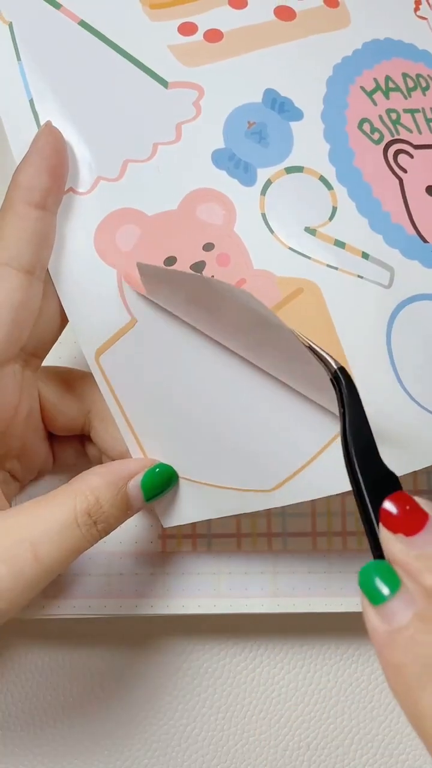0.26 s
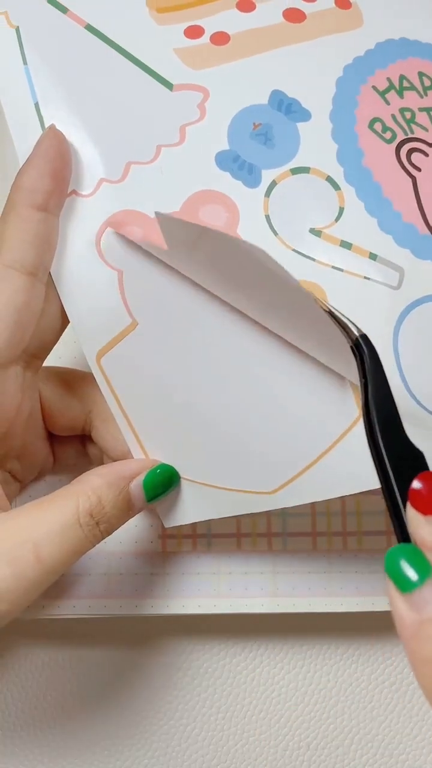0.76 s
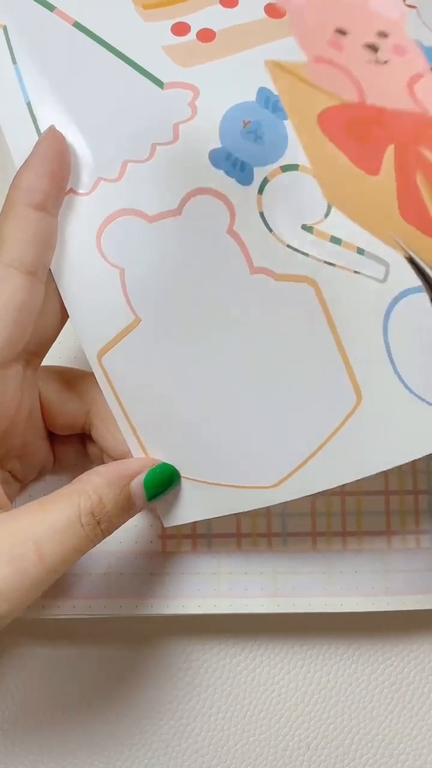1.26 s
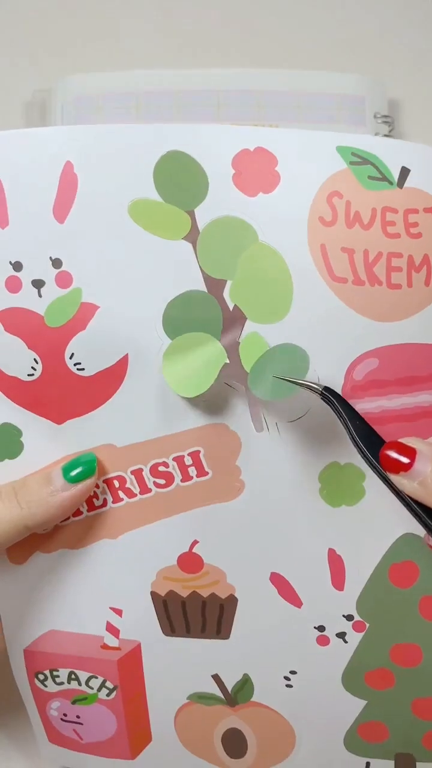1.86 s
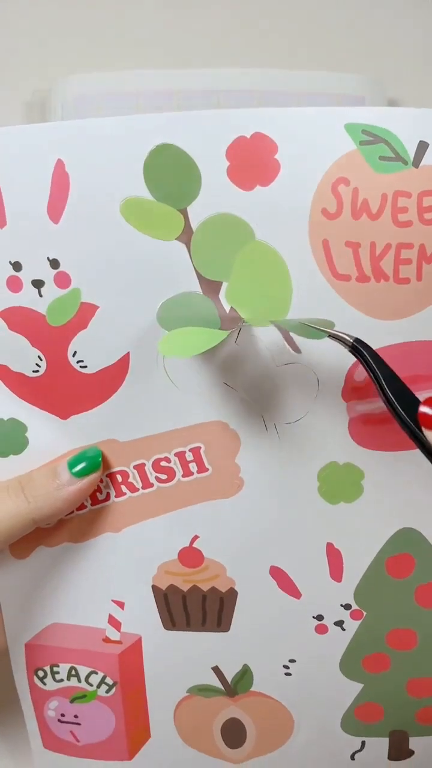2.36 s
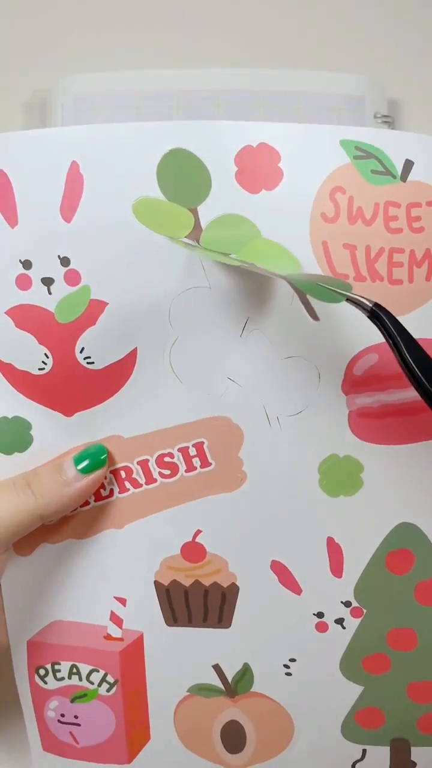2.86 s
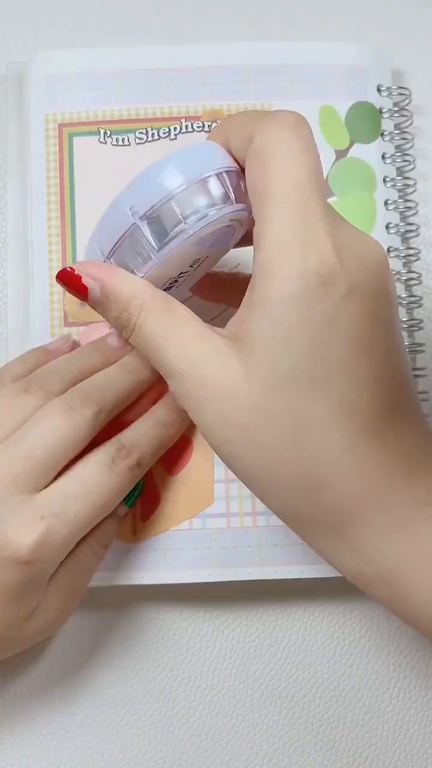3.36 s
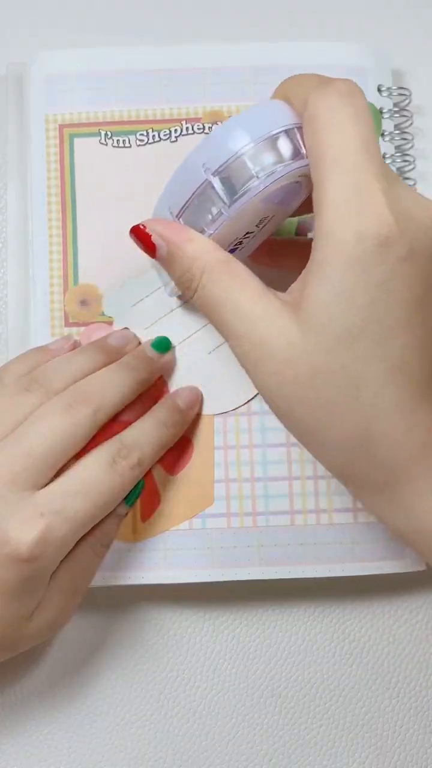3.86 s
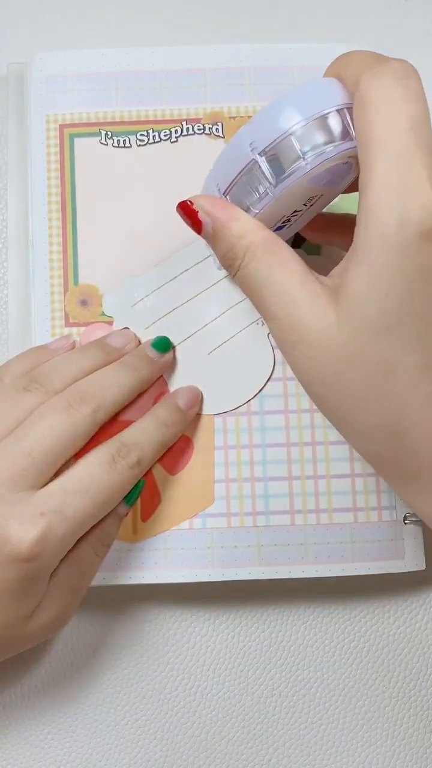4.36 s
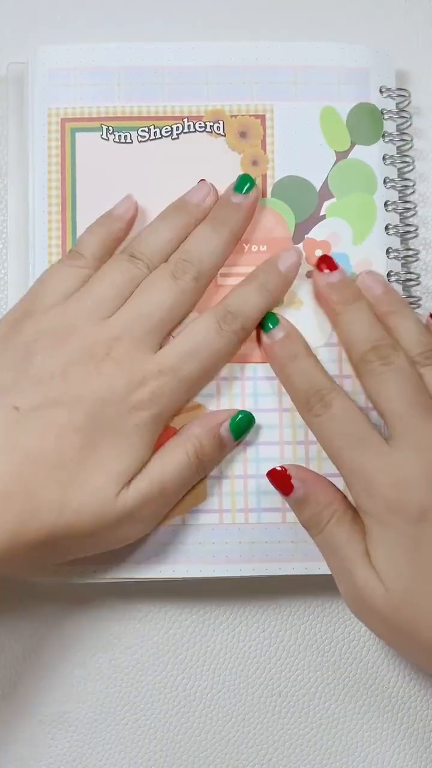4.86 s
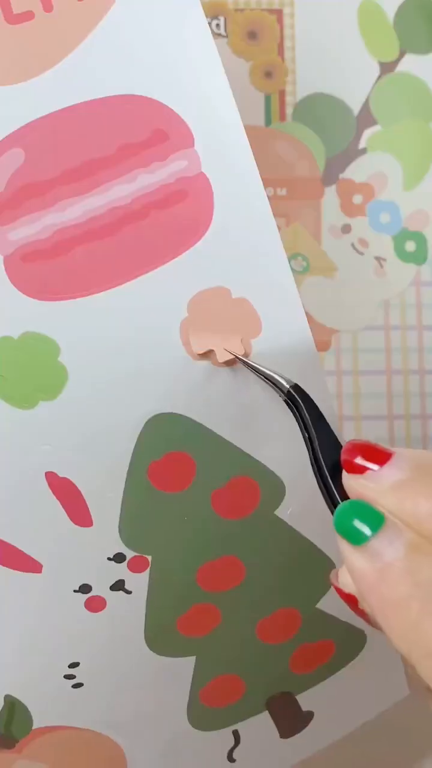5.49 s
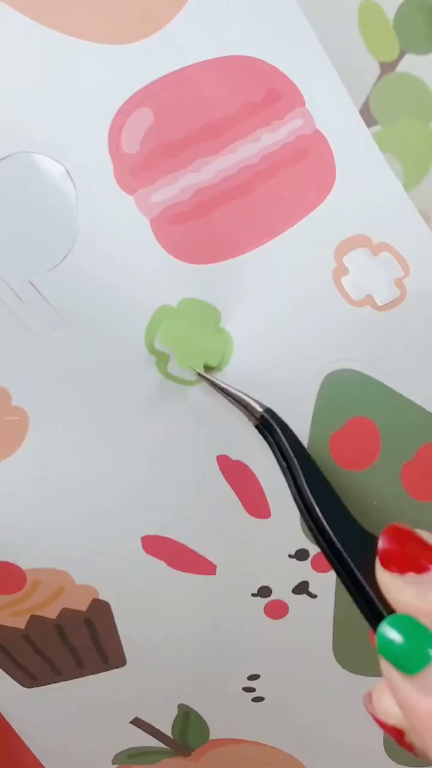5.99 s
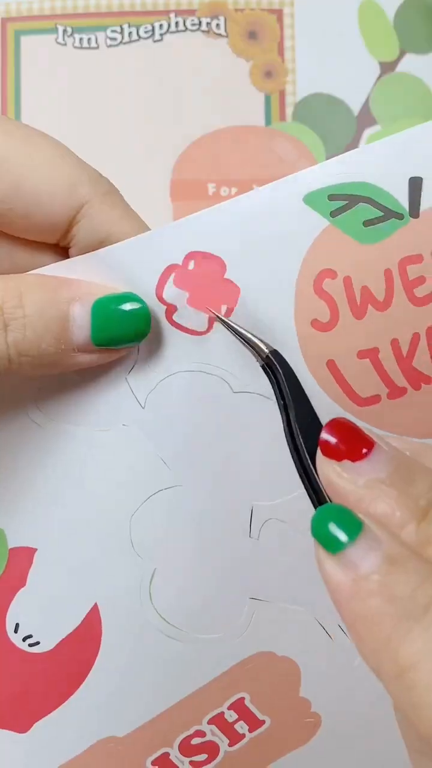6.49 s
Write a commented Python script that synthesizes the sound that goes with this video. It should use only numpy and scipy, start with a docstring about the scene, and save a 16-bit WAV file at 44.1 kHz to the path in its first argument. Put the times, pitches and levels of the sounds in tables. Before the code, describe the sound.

From the start, tweezers peel a sticker off its backing sheet, close to the microphone: irregular sharp snaps of glue over a grainy hiss, ending with papery flaps at about 1.2 seconds. A second peel crackles in jerks from 1.3 to 3.2 seconds, strongest near 2.4 and 3.1. From about 3.6 to 4.2 seconds a glue-tape roller rattles its plastic housing, with a soft tape hiss and a few more clicks up to 4.6. Then, until 5.4 seconds, fingertips rub the sticker onto a page: a smooth sliding hiss, short juddering groans of skin on paper, and a run of low, booming thumps from the desk. From 5.4 to about 6.7 seconds several short peels follow, with crisp ticks and flaps of the sheet, loudest near 6.5. The sound is fairly dry and mono, with a faint hiss and low room rumble underneath.

```python
"""Peeling and rubbing down stickers

Tweezers peel stickers off a backing sheet, close to a mono microphone on a quiet desk. The glue
snaps in jerks and hisses as its threads tear; the sheet rings and flaps. A glue-tape roller rattles
its plastic housing over a sticker, then fingertips rub it down, groaning as they stick and slip on
the page and making the desk boom. The peeling resumes; a low room rumble lies under it all."""
import sys
import numpy as np
from scipy import signal
from scipy.fft import rfft, irfft
from scipy.io import wavfile
from scipy.ndimage import uniform_filter1d

SR = 44100
rng = np.random.default_rng(int(sys.argv[2]) if len(sys.argv) > 2 else 0)


def wav_out(sig):
    """Save sig, one row per channel (or a flat mono array), as 16-bit PCM at SR to the path in sys.argv[1]."""
    wavfile.write(sys.argv[1], SR, np.round(np.clip(np.atleast_2d(sig).T, -1, 1) * 32767).astype(np.int16))


N = 296793

# room tone spectrum: (frequency [Hz], level [dB])
ROOM_SPECTRUM = [(22, 5.5), (60, -10.5), (250, -4), (400, -16), (1000, -23), (3000, -34), (9000, -33),
                 (11000, -31), (15500, -35), (16400, -60)]
# rumble bed: (time [s], level near 50 Hz [dB], level near 100 Hz [dB])
RUMBLE_LEVELS = [(0.0, -46, -40.5), (0.3, -43.5, -34.5), (0.9, -42, -45), (2.1, -41.5, -49),
                 (3.5, -37.5, -43), (4.6, -34.5, -35.5), (5.4, -34.5, -42.5), (6.73, -44, -49.5)]
# a moving hand swells the rumble: (crest time [s], level [dB])
RUMBLE_SWELLS = [(1.1, -38), (1.69, -39.5), (2.5, -35), (3.15, -31.5), (3.45, -39), (4.8, -27), (4.93, -29),
                 (5.22, -18), (5.7, -45), (5.9, -34), (6.2, -32), (6.48, -29)]
# steady pull on the glue line, one envelope a sticker: (time [s], hiss level [dB])
PEEL_STROKES = [
    [(0.0, -40), (0.2, -45), (0.37, -44.5), (0.72, -46.5), (0.98, -37.5), (1.05, -31.5), (1.15, -44),
     (1.2, -60), (1.33, -68)],
    [(1.335, -46), (1.45, -40), (1.57, -64), (1.87, -53), (2.17, -64.5), (2.45, -52.5), (2.99, -66),
     (3.06, -33.5), (3.22, -47.5), (3.3, -71)],
    [(5.425, -55.5), (5.6, -39), (5.7, -59), (5.84, -54), (6.0, -61)],
    [(6.02, -60), (6.15, -45), (6.285, -67)],
    [(6.3, -51), (6.41, -29), (6.55, -63)],
    [(6.57, -39), (6.64, -83), (6.73, -37)],
]
# tone of the peeling and sliding hiss: (frequency [Hz], level [dB])
HISS_SPECTRUM = [(880, -31.5), (1500, -3), (3340, 0.5), (4160, -1), (5180, 1), (5780, 1), (8290, 1.5),
                 (11200, -11.5), (15100, -9), (16400, -26)]
# resonances of the backing sheet over the desk: (frequency [Hz], width [Hz], level [dB])
SHEET_MODES = [(262, 200, -12), (614, 58, -4.5), (770.5, 17, -2), (1050, 68, -5.5), (1355, 95, -5)]
# glue letting go in one jerk: (time [s], crack level [dB], ring [Hz], dullness [dB], sheet jolt [dB])
GLUE_SNAPS = [(0.0085, -2.5, 5140, 4, -27), (0.0358, -10, 7900, -3, -36), (0.0867, -9.5, 4930, 4, -32),
              (0.0948, -10.5, 5050, -7, -35), (0.1172, -8, 7000, 4, -30), (0.127, -6, 6500, 0, -36),
              (0.1548, -3, 6480, 0, -17), (0.16, -3.5, 6400, -2, -12.5), (0.1753, -18, 7060, -9, -38),
              (0.199, -9, 7400, 1, -23), (0.2277, -5, 5760, 1, -18), (0.251, -9, 3010, -2, -19),
              (0.2739, -4.5, 4730, 1, -17.5), (0.303, -14.5, 7320, -2, -25), (0.3228, -17, 8180, -5, -24),
              (0.3522, -0.5, 7400, 1.5, -20), (0.3776, -5, 8200, 0, -21), (0.4615, -10.5, 8000, -5, -36),
              (0.4743, -12.5, 1720, 12, -29), (0.5213, -16, 4640, 13, -35), (0.55, -2, 4600, -4, -30),
              (0.564, -13, 7440, -5, -34), (0.5669, -6.5, 8100, 4, -16), (0.5844, -6, 8330, -6, -30),
              (0.6006, -20, 7490, -4, -34), (0.609, -7.5, 7500, 3, -22), (0.6153, -8.5, 4600, 6, -19),
              (0.654, -11, 4730, 1, -17), (0.662, -9.5, 8200, 6, -22), (0.6696, -7, 7600, -3, -21),
              (0.7313, -1.5, 1420, 5.5, -11), (0.7602, -8, 4630, 7, -16.5), (0.7718, -14, 1250, 3, -32),
              (0.798, -11, 4280, 10, -22), (0.8155, -3.5, 3070, 6, -14.5), (0.8803, -30, 1460, 2, -38),
              (0.9054, -5.5, 3020, 0, -17.5), (0.933, -19, 4850, 1, -35), (0.9562, -10, 4640, 1, -33),
              (0.9682, -1.5, 6160, 7, -10.5), (0.9994, -7.5, 4800, 15, -20), (1.0063, -3, 2950, 10, -15),
              (1.0335, -7, 5700, 7, -14), (1.0507, -14, 6270, 1, -14), (1.0828, 0, 1030, 6, -8.5),
              (1.1021, -16, 900, 16, -10), (1.156, -21, 3000, 4, -21), (1.1862, -15.5, 1030, 16.5, -4),
              (1.2825, -50, 1480, 14, -12.5), (1.333, -22, 1360, 0, -22), (1.3494, -22, 1400, 8, -24),
              (1.3812, -11, 1410, -2, -19), (1.391, -15.5, 895, 0, -16.5), (1.4054, -8.5, 1450, -1, -20),
              (1.4213, -10.5, 1380, -4, -13), (1.4284, -18, 940, -7, -19), (1.4606, -1.5, 8450, -1, -24),
              (1.4754, -8, 7400, -10, -33), (1.6318, -3, 830, -4, -26), (1.6387, -12.5, 1280, 9, -26),
              (1.6882, -3.5, 4050, -4.5, -17.5), (1.7209, -4, 6900, -0.5, -20), (1.7338, -4, 5200, -2, -14),
              (1.741, -9.5, 920, -1, -18), (1.7536, -3.5, 1470, 0, -17.5), (1.8315, -18, 8100, -13, -40),
              (1.8546, -10, 8570, -9, -36), (1.8814, -7.5, 3010, 7, -16), (1.8941, -12, 7210, -8, -33),
              (1.9047, -11.5, 1420, 1, -24), (1.9525, -5.5, 5200, -3, -18), (1.981, -17, 7490, -12, -40),
              (1.9924, -8.5, 6750, -11, -21.5), (2.02, -8, 8100, -9, -26), (2.0613, -14, 6890, -7, -34),
              (2.0786, -13.5, 3000, -8, -31), (2.0961, -8, 7960, -8, -23), (2.1156, -16, 7280, -11, -35),
              (2.1312, -19, 7250, -6, -37), (2.1503, -10, 985, -11, -20.5), (2.241, -20, 2350, -1, -38),
              (2.2543, -15.5, 2350, -4, -24), (2.325, -16, 7400, -1, -33), (2.3749, -5.5, 2370, 4, -11.5),
              (2.4024, -8, 6500, -10, -21), (2.417, -12, 900, -1, -35), (2.4326, 3, 2280, 3.5, -6.5),
              (2.4381, 1, 8640, -8, -5), (2.4428, 2.5, 7600, 1, -19), (2.482, -9.5, 1390, 0, -14),
              (2.4973, -9.5, 920, -7, -17), (2.646, -14.5, 1300, 1, -26), (2.6507, -13, 1400, 7.5, -30),
              (2.7246, -1.5, 1410, 0, -13.5), (2.7708, -5, 7050, -2, -18),
              (2.8352, -0.5, 7830, -1.5, -16.5), (2.9351, -20.5, 1380, -3, -35),
              (2.9671, -1, 1410, -5.5, -16), (3.0035, -4, 7700, -7, -19), (3.0215, 1, 4770, 5, -14),
              (3.028, -8, 6200, -10, -17), (3.0322, -6, 8160, -7, -18), (3.0365, -9, 2760, 2, -29),
              (3.0439, -4.5, 2840, 10, -10), (3.0577, 1, 4130, -3, -9.5), (3.0728, -4, 3900, 5, -6),
              (3.0783, -2.5, 4070, 4, -18), (3.1057, -3.5, 3490, 2, -10), (3.1276, -18, 5470, -7, -34),
              (3.135, -10.5, 3150, 9, -31), (3.1414, -17, 3400, 0, -32), (3.17, -16, 960, 2, -36),
              (3.1768, -6, 1440, 7.5, -13), (3.4139, -5, 1480, 17.5, -10.5), (3.6438, 0.5, 2680, 3, -16),
              (4.2896, -10, 3570, 2.5, -26), (4.3316, -35, 3500, 4, -34), (4.348, -18.5, 3530, 7, -32),
              (4.4031, -13, 3600, 0, -35), (4.451, -10, 1210, 5.5, -27), (4.4786, -24, 3600, 2, -30),
              (4.5063, -6.5, 5200, 2.5, -28), (4.531, -9.5, 5960, 3, -22), (4.5538, 2.5, 3840, -2, -29),
              (4.563, -1.5, 3600, 1, -18), (5.4596, -13, 7400, -9, -17), (5.4912, -14, 5260, -16, -25),
              (5.498, -22, 5400, -13, -32), (5.5329, -2.5, 6900, -6, -16), (5.559, -19, 7900, 2, -19),
              (5.5668, -10, 6900, -3, -18), (5.573, -14, 5080, 0, -24), (5.609, -9.5, 885, -3, -16),
              (5.614, -9, 1380, -2, -16), (5.6451, -7.5, 3840, -5, -14), (5.6543, -5.5, 8790, -2, -12),
              (5.6709, -9, 8870, -1, -17), (5.6791, -3.5, 7040, -4, -10), (5.691, -12, 900, -3, -31),
              (5.7206, -6.5, 1490, 5, -19), (5.75, -20.5, 8400, -19, -41), (5.7595, -25, 1830, -5, -33),
              (5.9006, -5, 940, 5, -19), (5.9042, -0.5, 2930, 7, -7.5), (6.019, -24, 8600, -13, -24),
              (6.0405, -31, 9000, -8, -34), (6.0559, -11, 8700, 13, -15), (6.0621, -7.5, 9000, -7, -26),
              (6.0797, -15, 2370, 0, -15), (6.0953, -11.5, 2300, 0, -17), (6.106, -11.5, 6070, 2, -20),
              (6.1206, -20.5, 2970, 19, -21), (6.1512, -14, 2270, 5, -22), (6.1786, -12.5, 1860, 17, -11),
              (6.1871, -6, 2220, 12.5, -10.5), (6.2427, -29, 2400, -5, -29), (6.304, -26, 1440, -12, -28),
              (6.323, -15, 6500, -9, -16.5), (6.338, -11, 960, 3, -17), (6.3562, -13, 900, 0, -14),
              (6.3637, -14, 1600, -10, -12), (6.3801, -11, 950, -16, -14), (6.386, -5, 1470, 5, -8),
              (6.4152, -15, 900, -7, -18), (6.4294, -16, 3320, -5, -17), (6.44, -22, 950, -3, -13),
              (6.448, -9, 990, 9, -14), (6.4564, -2.5, 1024, -3, -2), (6.4608, -9, 900, -1, -2),
              (6.4753, -12.5, 1760, 12, -2), (6.569, -24, 9000, -9, -26), (6.5831, -10, 7040, -8, -19),
              (6.5933, -8.5, 900, -1, -16), (6.6012, -4.5, 9250, -8.5, -28), (6.637, -18.5, 4890, 0, -28),
              (6.6541, -20.5, 6450, -6, -39), (6.6652, -26, 6570, 0, -42), (6.6942, -16.5, 4820, -1, -35)]
# tone of the crack: (frequency [Hz], level [dB])
CRACK_SPECTRUM = [(900, -18), (1500, -1), (2300, -2), (3000, 0), (4600, 1), (5500, -2), (8200, 0),
                  (10500, -4), (13000, -6), (15300, -10), (16400, -30)]
# mid, high and top of the crack: (level [dB], gain per dullness [dB/dB], scatter [dB])
CRACK_BALANCE = [(-6, 0.56, 0.64), (-1.92, -0.22, 1.5), (-6, -0.84, 3.5)]
# the same three bands: (low edge [Hz], high edge [Hz], burst length [share of the tear],
# tail level [dB], tail decay [ms], room decay [ms])
CRACK_BANDS = [(1480, 3660, 0.31, -24.5, 5.2, 43), (5060, 8650, 0.35, -21.5, 2.74, 23.8),
               (9540, 15000, 0.14, -25, 2.3, 24)]
# the sheet bending or springing back: (time [s], level [dB], pitch [Hz])
SHEET_FLAPS = [(1.077, -15.5, 71.5), (1.096, -12, 181), (1.146, -16, 203), (1.186, -3.5, 316),
               (1.282, -11, 317), (1.419, -20.5, 294), (1.68, -29, 60), (2.374, -20.5, 104),
               (2.433, -21, 158), (2.918, -24, 105), (2.985, -21.5, 148), (3.041, -23, 250),
               (3.106, -19.5, 248), (3.145, -17, 140), (3.175, -24, 300), (4.545, -21, 70),
               (5.678, -9, 700), (5.901, -12, 55.6), (6.059, -13, 310), (6.185, -8, 124),
               (6.458, -4.5, 490)]
# soft, brushing hisses: (start [s], end [s], low edge [Hz], high edge [Hz], level [dB])
SOFT_BRUSHES = [(1.083, 1.28, 450, 1580, -28), (3.321, 3.374, 3160, 5500, -42),
                (3.405, 3.602, 800, 2100, -36.5), (5.527, 5.873, 666, 870, -35.5),
                (5.898, 5.993, 504, 950, -33), (6.2, 6.265, 1810, 2800, -41), (6.48, 6.54, 1500, 2600, -57)]
# low resonances of the desk top: (frequency [Hz], width [Hz], level [dB])
DESK_MODES = [(105, 26, -6.5), (220, 17.8, 0), (270, 20.6, -0.5)]
# a fingertip shoves the book against the desk: (crest time [s], level [dB], pitch [Hz], swell [ms])
DESK_SHOVES = [(4.747, -9.5, 245.4, 9.5), (4.795, -1, 245, 13), (4.829, -9.5, 266.4, 17),
               (4.891, -4.5, 238.2, 7.3), (4.911, -0.5, 222.8, 7.2), (4.926, -2.5, 222.3, 5.8),
               (4.987, -7, 243, 15), (5.037, -1.5, 239.5, 8.1), (5.073, -9.5, 260.1, 9),
               (5.109, -7.5, 235, 2), (5.142, -7, 253.6, 6), (5.186, -3, 255.6, 19), (5.225, 3, 233.8, 4),
               (5.265, -5, 250, 3.2), (5.285, 0, 256.7, 12.3), (5.346, 0.5, 248.7, 5.1),
               (5.365, -5.5, 256, 2.9), (5.4, -23, 242, 7)]
# tape paying out, then skin sliding on paper, one envelope a stroke: (time [s], hiss level [dB])
SLIDE_STROKES = [
    [(3.3, -57), (3.6, -47), (3.8, -39.5), (4.0, -36), (4.24, -50), (4.5, -40.5), (4.645, -44.5)],
    [(4.65, -34), (4.765, -44.5)],
    [(4.77, -32), (4.93, -26.5), (5.12, -34.5), (5.22, -30), (5.32, -38), (5.42, -32)],
]
# running rattle of the roller: (time [s], level [dB])
RATTLE_LEVELS = [(3.6, -44), (3.68, -26.5), (3.808, -31.5), (3.938, -28), (4.22, -61)]
# roller teeth slipping: (time [s], level [dB], favoured ring [Hz])
TOOTH_SLIPS = [(3.59, -37, 1420), (3.61, -36, 3730), (3.624, -19, 3640), (3.6427, -10.5, 2640),
               (3.6657, -17, 2660), (3.706, -23, 2460), (3.731, -40, 2480), (3.7625, -29, 2750),
               (3.788, -26, 2570), (3.8229, -14.5, 2580), (3.8509, -14, 2700), (3.8962, -20, 2100),
               (3.8962, -23, 2960), (3.909, -19.5, 1340), (3.94, -37, 4000), (3.982, -17, 2490),
               (4.0096, -16.5, 4290), (4.032, -12, 4180), (4.0625, -16.5, 2140), (4.0893, -27, 2720),
               (4.1076, -18.5, 2220), (4.1284, -17.5, 2840), (4.163, -23, 1290)]
# resonances of the roller housing: (frequency [Hz], width [Hz], level [dB])
HOUSING_MODES = [(1250, 410, -3.5), (2012, 48, 3), (2630, 230, 3), (3030, 49, 1), (3410, 320, -2),
                 (4230, 210, 1), (4900, 170, -12), (5900, 94, -8), (7000, 810, -11)]
# a fingertip judders on the page:
# (start [s], end [s], first slip rate [Hz], last slip rate [Hz], first level [dB], last level [dB])
FINGER_JUDDERS = [(4.767, 4.807, 187.4, 206, -10, -24), (4.885, 4.922, 101.3, 110, -12, -8.5),
                  (4.947, 4.986, 217, 266, -16, -16), (5.007, 5.055, 260.5, 208, -12.5, -5.5),
                  (5.201, 5.231, 139.6, 190, -3.5, -19), (5.255, 5.291, 125.3, 228, -6, -10.5),
                  (5.329, 5.374, 157, 260, -6, -14), (5.421, 5.422, 233, 185.2, -17, -17)]
# single slips of the fingertip: (time [s], level [dB])
FINGER_SLIPS = [(5.143, -16), (5.177, -5), (5.382, -15)]
# resonances of the page under the finger: (frequency [Hz], width [Hz], level [dB])
PAGE_MODES = [(414, 300, 3), (747, 140, 6), (930, 120, 0), (1480, 260, -3.5), (2970, 1900, -7.5)]


def undb(db):
    """Decibels to gain."""
    return 10 ** (np.asarray(db) / 20)


def unit(x):
    """Scale to rms 1."""
    return x / np.sqrt(np.mean(x ** 2))


def noise():
    """White noise."""
    return rng.standard_normal(N)


def curves(table):
    """Each column as a curve in time, and a gate that is open over the table's span."""
    times, *columns = np.transpose(table)
    t = np.arange(N) / SR
    return [np.interp(t, times, column) for column in columns], (t >= times[0]) & (t <= times[-1])


def colour(x, spectrum):
    """Minimum-phase EQ with the given (Hz, dB) shape and unit power gain."""
    hz, db = np.transpose(spectrum)
    log_hz = np.log(np.fft.rfftfreq(8192, 1 / SR) + 1)
    cepstrum = irfft(np.interp(log_hz, np.log(hz), db) * np.log(10) / 20)
    cepstrum[1:4096] *= 2  # fold onto positive time: no ringing ahead of a sound
    cepstrum[4097:] = 0
    response = irfft(np.exp(rfft(cepstrum)))[:4096]
    return signal.fftconvolve(x, response / np.sqrt(np.sum(response ** 2)))[:N]


def band(x, lo_hz, hi_hz, order=2):
    """Band-pass scaled so that white noise stays near rms 1."""
    sos = signal.butter(order, [lo_hz, hi_hz], "band", fs=SR, output="sos")
    return signal.sosfilt(sos, x) * np.sqrt(SR / 2 / (hi_hz - lo_hz))


def ring(x, modes):
    """Bank of resonators (Hz, width Hz, dB), summed in alternating polarity."""
    return sum((-1) ** k * undb(db) * signal.lfilter(*signal.iirpeak(hz, hz / width, SR), x)
               for k, (hz, width, db) in enumerate(modes))


def impulses(times, gains):
    """A one-sample spike at each time."""
    return np.bincount(np.minimum((np.asarray(times) * SR).astype(int), N - 1), gains, N)


def decay(x, ms):
    """Give every spike an exponential tail."""
    return signal.lfilter([1], [1, -np.exp(-1000 / (ms * SR))], x)


def wander(rate_hz):
    """Glides between random values, rms 1."""
    hold = int(SR / rate_hz)
    steps = np.repeat(rng.standard_normal(N // hold + 1), hold)
    return unit(uniform_filter1d(steps, hold)[:N])


def grains(per_s, spread_db, ms):
    """Envelope of tiny random ticks; few are large, most are small."""
    sizes = undb(spread_db * np.minimum(rng.exponential(size=N), 3))
    return unit(decay(sizes * (rng.random(N) < per_s / SR), ms))


def bursts(times, gains, lengths_ms):
    """Envelope that jumps up at each time and falls as half a bell curve."""
    out, t_ms = np.zeros(N + SR), np.arange(SR // 50) * 1000 / SR
    for start, gain, ms in zip(times, gains, lengths_ms):
        out[int(start * SR):][:len(t_ms)] += gain * np.exp(-(t_ms / ms) ** 2)
    return uniform_filter1d(out[:N], size=14)


def pings(times, gains, pitches_hz, decays_ms):
    """A dying sine at each time."""
    out, t = np.zeros(N + SR), np.arange(SR // 30) / SR
    for start, gain, hz, ms in zip(times, gains, pitches_hz, decays_ms):
        out[int(start * SR):][:len(t)] -= gain * np.sin(2 * np.pi * hz * t) * np.exp(-1000 * t / ms)
    return out[:N]


def paper_hiss(strokes, grain_db, fizz_db):
    """A wavering hiss roughened by fine ticks; the sheet rustles along with it."""
    ticks = undb(grain_db) * grains(per_s=320, spread_db=5, ms=0.35)
    hiss = unit(colour(noise(), HISS_SPECTRUM)) + undb(fizz_db) * band(noise(), 7900, 15500)
    hiss *= undb(2.9 * wander(rate_hz=60)) * (1 + ticks)
    rustle = unit(band(noise(), 230, 1660)) + undb(-6) * unit(ring(noise(), SHEET_MODES))
    rustle *= undb(-45.5 + 3.55 * wander(rate_hz=40)) * (1 + 0.45 * ticks)
    out = 0
    for stroke in strokes:
        (db,), gate = curves(stroke)
        follow_db = 0.6053 * (db + 44)  # the rustle swells less than the hiss
        out += gate * (hiss * undb(db) + rustle * undb(follow_db))
    return out


def room_tone():
    """Faint room hiss and a low rumble that swells when the hands move."""
    (low_db, high_db), _ = curves(RUMBLE_LEVELS)
    t = np.arange(N) / SR
    swell = sum(undb(db) * np.exp(-((t - crest) / 0.037) ** 2) for crest, db in RUMBLE_SWELLS)
    low = (undb(low_db) + swell) * unit(band(noise(), 37.8, 57.6))
    high = (undb(high_db) + undb(0.5) * swell) * unit(band(noise(), 89, 128.3))
    return undb(-44) * unit(colour(noise(), ROOM_SPECTRUM)) + low + high


def glue_peel():
    """Glue threads tear by the thousand in a grainy, fizzy hiss."""
    return paper_hiss(PEEL_STROKES, grain_db=3, fizz_db=-17.5)


def glue_snaps():
    """Glue lets go with a click and a short burst; the desk echoes it, the room answers faintly."""
    times, crack_db, ring_hz, dull_db, jolt_db = np.transpose(GLUE_SNAPS)
    *level_luck, length_luck = rng.standard_normal((len(times), 4)).T
    levels_db = [crack_db + db + tilt * dull_db + scatter_db * luck
                 for (db, tilt, scatter_db), luck in zip(CRACK_BALANCE, level_luck)]
    # each tear lasts a few random milliseconds, slightly shorter when the jolt is strong
    tear_ms = np.clip((3.07 - 0.03 * (jolt_db - crack_db)) * np.exp(0.33 * length_luck), 0.5, 8)
    sharpness = np.minimum(1.41 / tear_ms, 1) ** 2.55  # a long tear has no single click
    crack = colour(noise(), CRACK_SPECTRUM)
    out = 0
    for db, (lo_hz, hi_hz, share, tail_db, tail_ms, room_ms) in zip(levels_db, CRACK_BANDS):
        jerks = impulses(times, undb(db))
        lead_in = undb(-17) * decay(jerks[::-1], ms=0.83)[::-1]  # a faint swell into each snap
        burst = bursts(times, undb(db), share * tear_ms)
        desk_echo = 0.073 * np.roll(burst, int(0.00252 * SR))
        tail = undb(tail_db) * (decay(jerks, tail_ms) + undb(-12) * decay(jerks, room_ms))
        out += unit(band(crack, lo_hz, hi_hz, order=3)) * (lead_in + 0.42 * burst + desk_echo + tail)
        click = band(impulses(times, sharpness * undb(db)), lo_hz, hi_hz, order=3)
        out -= 0.8 * np.sqrt(SR / 2 / (hi_hz - lo_hz)) * click
    mid_db, high_db, _ = levels_db
    is_low = ring_hz < 5000
    ring_db = np.where(is_low, mid_db, high_db) - 7
    return out + pings(times, undb(ring_db), ring_hz, decays_ms=np.where(is_low, 2.6, 1.3))


def sheet_jolts():
    """Each snap tugs the whole sheet one way: a blunt pulse and the ring of the sheet's modes."""
    times, *_, jolt_db = np.transpose(GLUE_SNAPS)
    tugs = -uniform_filter1d(impulses(times, undb(jolt_db)), size=9)
    shake = decay(tugs, ms=3.94) * noise()
    return 3.48 * band(tugs, 434, 1310) + 24.4 * ring(tugs + 0.13 * shake, SHEET_MODES)


def sheet_flaps():
    """A sudden push of air, a few dying swings of the sheet and a papery flutter."""
    swings, t = np.zeros(N + SR), np.arange(SR // 8) / SR
    for start, db, hz in SHEET_FLAPS:
        swing = np.sin(2 * np.pi * hz * t) * np.exp(-t * hz / 0.7)
        swings[int(start * SR):][:len(t)] += undb(db + 1) * swing
    times, levels_db, _ = np.transpose(SHEET_FLAPS)
    flutter = decay(impulses(times, undb(levels_db - 11)), ms=14.3) * unit(band(noise(), 286, 860))
    return swings[:N] + flutter


def brushes():
    """Soft hisses that start at once and thin out, like something light brushing paper."""
    out, t = 0, np.arange(N) / SR
    for start, end, lo_hz, hi_hz, db in SOFT_BRUSHES:
        progress = (t - start) / (end - start)
        gate = (progress > 0) & (progress < 1)
        out += undb(db) * band(noise(), lo_hz, hi_hz) * gate * (1 - 0.93 * progress)
    return out


def desk_boom():
    """The low modes of the desk top murmur under resting hands and boom with each shove."""
    hands_on_s, hands_off_s, settle_s = 3.24, 5.42, 0.45
    t = np.arange(N) / SR
    crests, crest_db, _, _ = np.transpose(DESK_SHOVES)
    resting = undb(-35.5) * np.clip((t - hands_on_s) / settle_s, 0, 1)
    after_shove = decay(impulses(crests, undb(crest_db - 15.5)), ms=32)
    drive = ring(noise(), [(236, 89, 0)]) + 0.068 * noise()
    out = (resting + after_shove) * unit(ring(drive, DESK_MODES))
    for crest, db, hz, swell_ms in DESK_SHOVES:
        near = slice(int((crest - 0.08) * SR), int((crest + 0.12) * SR))
        x = (t[near] - crest) * 1000 / swell_ms
        swell = np.where(x < 0, np.exp(-x ** 2 / 2), 1 / np.cosh(x / 0.96))  # release outlasts attack
        out[near] += undb(db - 2.5) * swell * np.sin(2 * np.pi * (hz * t[near] + rng.random()))
    return out * ((t > hands_on_s) & (t < hands_off_s))


def slides():
    """Tape pays out and skin slides on paper in a smooth, soft-topped hiss."""
    return paper_hiss(SLIDE_STROKES, grain_db=-12.5, fizz_db=-30)


def tape_roller():
    """Spool teeth and tape knock the housing in uneven volleys; each slip hisses and favours one ring."""
    (rattle_db,), gate = curves(RATTLE_LEVELS)
    times, slip_db, ring_hz = np.transpose(TOOTH_SLIPS)
    teeth = uniform_filter1d(decay(impulses(times, undb(slip_db + 4.5)), ms=8.9), size=60)
    grit = noise()
    rattle = gate * undb(rattle_db + 5.5) * (0.38 + grains(per_s=140, spread_db=4.5, ms=2.3))
    knocks = grit * (rattle + teeth)
    tape_hiss = undb(-19) * band(knocks, 4300, 9900) + undb(-26.5) * band(knocks, 9700, 14000)
    rings = pings(times, undb(slip_db - 6), ring_hz, decays_ms=np.full_like(times, 7))
    return ring(knocks, HOUSING_MODES) + tape_hiss + rings


def finger_groans():
    """Skin sticks and slips: an uneven pulse train, speeding up or slowing down, raps the page."""
    lone_times, lone_db = np.transpose(FINGER_SLIPS)
    slips = -impulses(lone_times, undb(lone_db))
    for start, end, first_hz, last_hz, first_db, last_db in FINGER_JUDDERS:
        time = start
        for gap_luck, level_luck in rng.standard_normal((40, 2)):
            progress = (time - start) / (end - start)
            if progress > 1:
                break
            slips[int(time * SR)] -= undb(first_db + progress * (last_db - first_db) + 0.6 * level_luck)
            time += np.exp(0.05 * gap_luck) / (first_hz + progress * (last_hz - first_hz))
    return 20.2 * ring(uniform_filter1d(slips, size=15), PAGE_MODES)  # soft skin blunts each rap


def scene():
    """One microphone feeds both channels."""
    mono = glue_snaps() + sheet_jolts() + sheet_flaps() + glue_peel()
    mono += slides() + brushes() + tape_roller()
    mono += finger_groans() + desk_boom() + room_tone()
    return np.array([mono, mono])


def record(dry):
    """Peaks are clipped at full scale, then a steep low-pass cuts the very top."""
    lowpass = signal.ellip(12, 0.3, 90, 16300, fs=SR, output="sos")
    return signal.sosfilt(lowpass, np.clip(dry, -1, 1))


dry = scene()
out = record(dry)
wav_out(out)
```